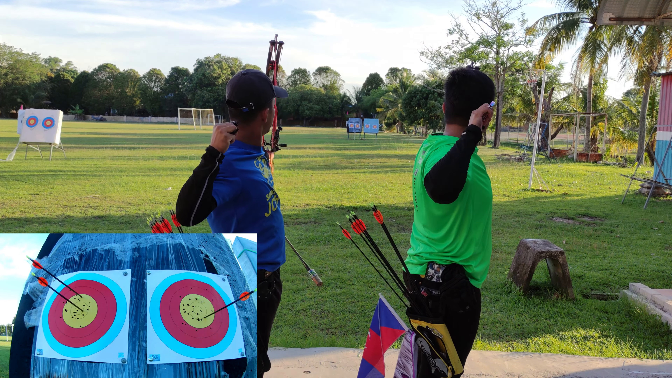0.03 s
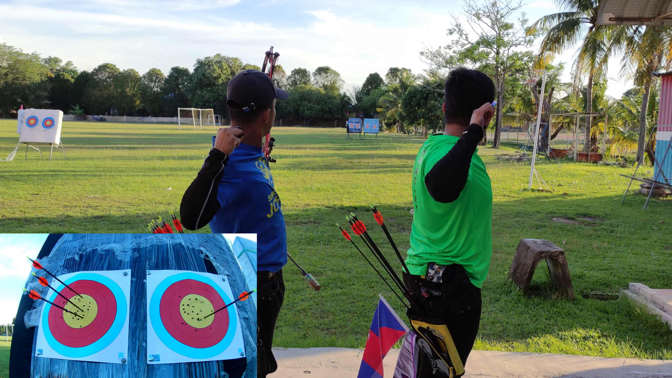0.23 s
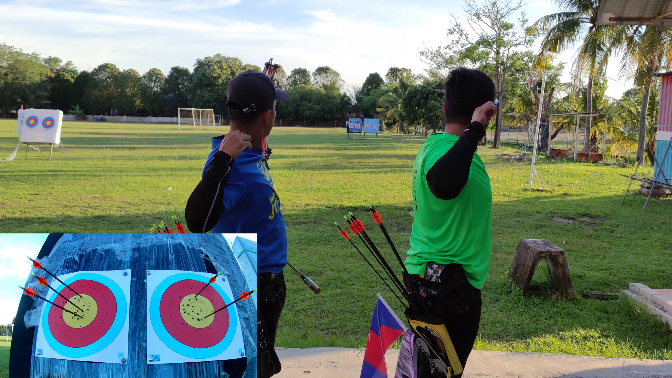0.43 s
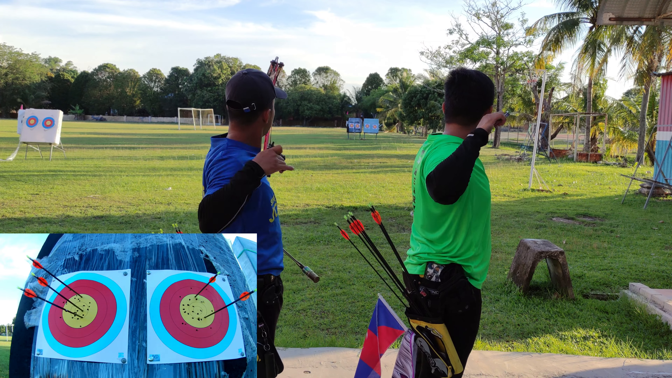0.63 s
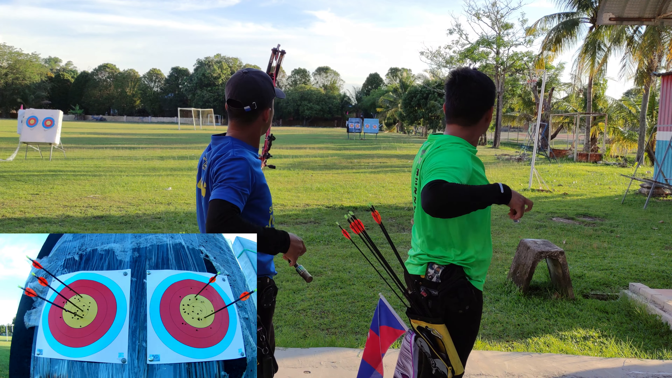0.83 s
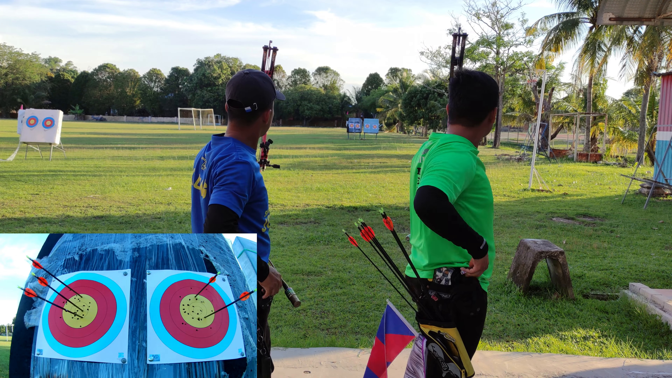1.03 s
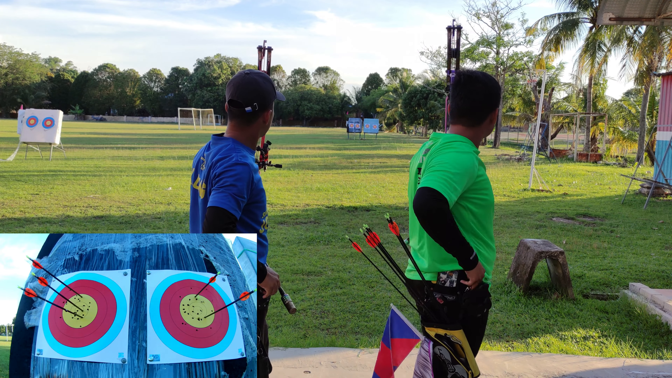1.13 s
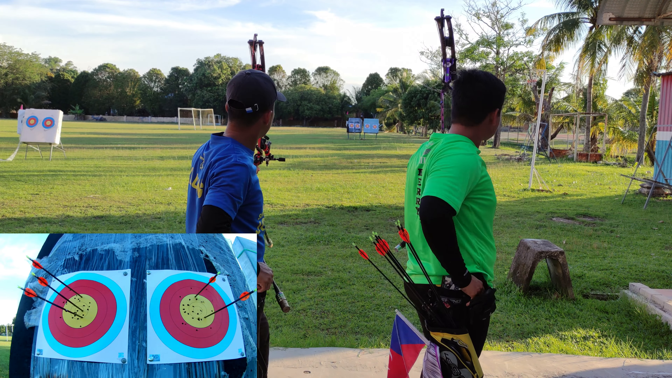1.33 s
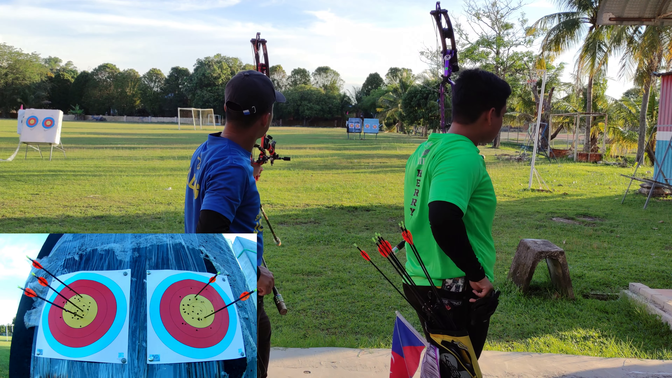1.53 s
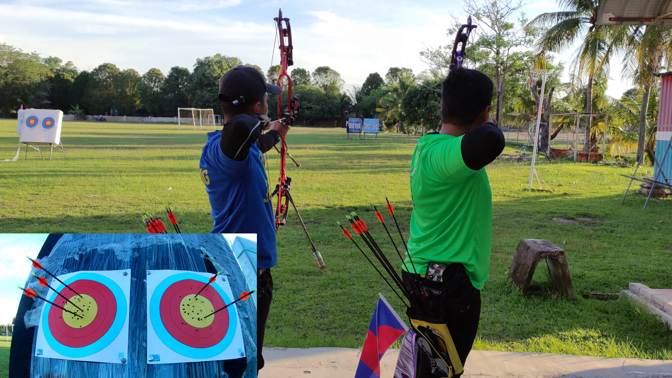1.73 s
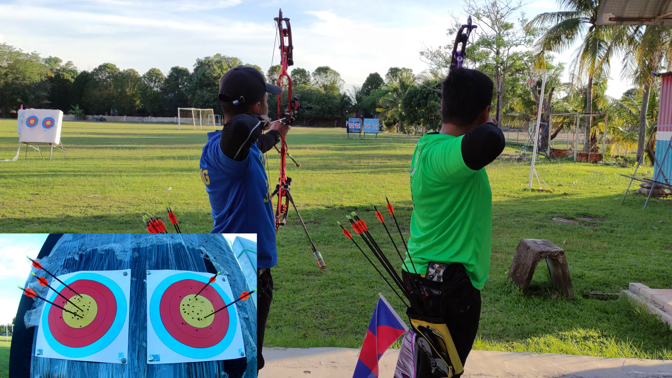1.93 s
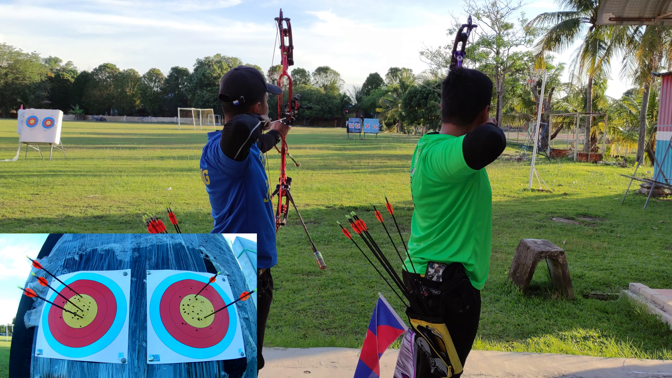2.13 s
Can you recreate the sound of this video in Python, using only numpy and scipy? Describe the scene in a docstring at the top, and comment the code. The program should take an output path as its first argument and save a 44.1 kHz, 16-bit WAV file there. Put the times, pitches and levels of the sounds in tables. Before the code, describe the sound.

A quick pair of bow shots cracks across an open field, followed by faint arrow rattling.

```python
"""An open field, where two archers loose their compound bows a tenth of a second apart.
Each shot is a crack and a short falling twang; milliseconds later the string knocks on its stop and
the bow thuds. A nearby wall returns a thin echo. Gear clicks softly as the bows are lowered and arrows
rustle in the quivers. Distant traffic rumbles throughout, with a light breeze on the microphone."""
import sys
import numpy as np
from scipy import signal
from scipy.io import wavfile

SR = 44100
rng = np.random.default_rng(int(sys.argv[2]) if len(sys.argv) > 2 else 0)


def file_out(sig):
    """Save sig as 16-bit WAV at sys.argv[1]."""
    # one column per channel
    cols = np.atleast_2d(sig).T
    # limit, then scale
    lim = np.clip(cols, -1, 1)
    pcm = np.round(lim * 32767).astype(np.int16)
    wavfile.write(sys.argv[1], SR, pcm)


N = 94815
T = np.arange(N) / SR


def from_db(db):
    """Decibels to gain."""
    return 10 ** (np.asarray(db) / 20)


def rms_one(x):
    """Scale to rms 1."""
    return x / np.sqrt(np.mean(x ** 2) + 1e-20)


def at_hz(points, hz):
    """Read a table on a log-frequency axis."""
    freqs, values = np.transpose(points)
    return np.interp(np.log(hz), np.log(freqs), values)


def fader(points):
    """Gain over time from (time [s], level [dB]) rows."""
    return from_db(np.interp(T, *np.transpose(points)))


def pan(db):
    """Stereo gains that put the left channel db above the right."""
    return from_db(db * np.array([[.5], [-.5]]))


def cut(x, hz, kind, order=2):
    """Butterworth low- or high-pass."""
    return signal.sosfilt(signal.butter(order, hz, kind, fs=SR, output="sos"), x + 1e-18)


def resonance(x, hz, width_hz):
    """Two-pole resonance with gain 1 at its peak."""
    r = np.exp(-np.pi * width_hz / SR)
    feedback = [1, -2 * r * np.cos(2 * np.pi * hz / SR), r * r]
    return signal.lfilter(np.array([1, 0, -1]) * (1 - r * r) / 2, feedback, x + 1e-18)


def decay(start, t60):
    """Envelope that jumps to 1 at start and falls 60 dB every t60 seconds."""
    age = np.maximum(T - start, 0)
    return (T >= start) * np.exp(-np.minimum(np.log(1000) * age / t60, 40))


def ring(start, hz, t60, sag=1e-6):
    """A struck sine whose pitch sinks as hz / (1 + sag * age)."""
    age = np.maximum(T - start, 0)
    return decay(start, t60) * np.sin(2 * np.pi * hz * np.log1p(sag * age) / sag)


def struck(start, modes):
    """A blow sets a table of modes ringing in alternating polarity."""
    return sum((-1) ** k * from_db(db) * ring(start, hz, t60) for k, (hz, db, t60) in enumerate(modes))


# Stereo width of the outdoor noise: (frequency [Hz], side minus mid [dB])
STEREO_WIDTH = [(60, -18), (110, -23.5), (200, -16.5), (380, -9.5), (700, -6.5), (1290, 0.5), (2380, -0.5),
                (4400, 0.5), (8120, 0), (15000, 0)]
def noise_bands():
    """A bank of stereo noise in third octaves: centres and signals."""
    edges = 20 * 2 ** (np.arange(30) / 3)
    centres = np.sqrt(edges[1:] * edges[:-1])
    white = rng.standard_normal((2, 2, N + 8000))
    bands = []
    for k, hz in enumerate(centres):
        bandpass = signal.butter(2, edges[k:k + 2], "band", fs=SR, output="sos")
        mid, side = signal.sosfilt(bandpass, white[k % 2])[:, -N:]
        width = from_db(at_hz(STEREO_WIDTH, hz))
        bands.append((mid + width * side * [[1], [-1]]) / np.hypot(1, width))
    return centres, np.array(bands)


def coloured(bank, spectrum):
    """Stereo noise with the given spectrum, rms 1."""
    centres, bands = bank
    return rms_one(np.tensordot(from_db(at_hz(spectrum, centres)), bands, 1))


# Low end of the traffic: (frequency [Hz], relative level [dB])
RUMBLE_EQ = [(20, -41), (35, -3), (55, 0), (90, 2.5), (140, -4.5), (220, -10), (330, -21.5), (600, -52)]
# The rumble swells near the end: (time [s], level [dB])
RUMBLE_FADER = [(0, -43), (.5, -41.5), (1.1, -42.5), (1.72, -42.5), (1.85, -39), (2.15, -39)]
# Midrange wash of the traffic: (frequency [Hz], relative level [dB])
WASH_EQ = [(200, -26), (400, -7), (650, -2.5), (900, 1), (1200, -1.5), (1800, -15.5), (3000, -21.5),
           (4500, -30.5), (9000, -60.5)]
# The wash drops back near the end: (time [s], level [dB])
WASH_FADER = [(0, -46.5), (.5, -46.5), (.9, -47), (1.7, -45.5), (1.82, -50.5), (2.15, -51)]
def traffic(bank):
    """Distant traffic lays a bed of low rumble and midrange wash."""
    rumble = fader(RUMBLE_FADER) * coloured(bank, RUMBLE_EQ)
    return rumble + fader(WASH_FADER) * coloured(bank, WASH_EQ)


# Airy top of the ambience: (frequency [Hz], relative level [dB])
AIR_EQ = [(2500, -5), (4500, -3.5), (6500, 9), (8000, 5), (9000, -17.5), (10500, -10), (16000, -1)]
# The hiss wavers and eases off: (time [s], level [dB])
AIR_FADER = [(0, -65.5), (.6, -69.5), (1.2, -66.5), (1.7, -72), (1.9, -74.5), (2.15, -74)]
def air(bank):
    """A faint, bright hiss hangs over the field."""
    return fader(AIR_FADER) * coloured(bank, AIR_EQ)


def breeze(level_db=-63, top_hz=55):
    """A light breeze flutters on each microphone port independently."""
    return from_db(level_db) * rms_one(cut(rng.standard_normal((2, N)), top_hz, "low", order=3))


# Tone of the shaking bow: (frequency [Hz], relative level [dB])
SHUDDER_EQ = [(50, -12), (300, 5.5), (800, -14), (1700, 0.5), (2600, -6.5), (4000, -16), (8000, -20),
              (16000, -44)]
# How long the shake lasts: (frequency [Hz], t60 [s])
SHUDDER_DECAY = [(100, 0.12), (400, 0.13), (1000, 0.058), (2500, 0.03), (8000, 0.013)]
def shudder(bank, start):
    """Limbs and fittings shake in a dull burst of noise; the treble dies first."""
    centres, bands = bank
    parts = from_db(at_hz(SHUDDER_EQ, centres))[:, None] * bands.mean(axis=1)
    burst = sum(part * decay(start, at_hz(SHUDDER_DECAY, hz)) for hz, part in zip(centres, parts))
    return burst / parts.sum(axis=0).std()


# The two shots: (time [s], twang pitch [Hz], twang level [dB], twang t60 [s], low-pass [Hz],
# shudder level [dB], echo level [dB], echo low-pass [Hz])
SHOTS = [(0.2371, 1610, 1, 0.017, 13000, -21, -21, 10400),
         (0.3493, 1643, -6, 0.029, 6560, -21.5, -28.5, 6700)]
# Bright attack of the first bow: (pitch [Hz], level [dB], t60 [s])
FIRST_CRACK = [(1826, -27, 0.032), (2230, -17.5, 0.009), (4330, -18.7, 0.0078), (7400, -27, 0.0074),
               (8740, -31, 0.0037)]
# Darker attack of the second bow: (pitch [Hz], level [dB], t60 [s])
SECOND_CRACK = [(1090, -5, 0.0038), (2270, -14.5, 0.016), (2683.0, -19, 0.02), (5370, -21.5, 0.0037)]
def releases(bank, sag_per_s=48.6):
    """Each bow cracks and shudders; its twang dives in pitch as the string goes slack."""
    out = 0
    for shot, crack in zip(SHOTS, (FIRST_CRACK, SECOND_CRACK)):
        start, hz, twang_db, t60, top_hz, shudder_db, *_ = shot
        twang = from_db(twang_db) * ring(start, hz, t60, sag_per_s)
        shake = from_db(shudder_db) * shudder(bank, start)
        out += cut(twang + struck(start, crack) + shake, top_hz, "low", order=3)
    return out


# Tone of the field's reverb tail: (frequency [Hz], relative level [dB])
SCATTER_EQ = [(300, 4), (1500, 9.5), (3000, -9), (7000, -10.5), (9000, -24), (11000, -27), (16000, -37)]
def field_scatter(bank, level_db=-44.5, t60=0.7):
    """The field scatters each shot back as a faint tail of noise."""
    tails = sum(decay(start, t60) for start, *_ in SHOTS)
    return from_db(level_db) * tails * coloured(bank, SCATTER_EQ)


# String hits and rebounds on the stops: (time [s], level [dB], pitch [Hz], t60 [s])
STOP_KNOCKS = [(0.2405, -3.5, 1173, 0.02), (0.2458, -17.9, 1540, 0.017), (0.3536, -2.5, 623.0, 0.0072),
               (0.3576, -11.5, 1620, 0.0055), (0.3627, -6.5, 504, 0.0081)]
# Body modes of the first bow: (pitch [Hz], level [dB], t60 [s])
FIRST_THUD = [(85, -41, 0.096), (131, -26, 0.066), (206, -20.5, 0.084), (298, -26, .08), (392, -7.5, .036),
              (549, -13, 0.063), (876, -9, .029), (1140, -31.5, .045)]
# Body modes of the second bow: (pitch [Hz], level [dB], t60 [s])
SECOND_THUD = [(154.4, -22.5, 0.11), (182, -22, 0.1233), (276, -14, 0.038), (406, -12, 0.0607),
               (560, -13, 0.052), (926, -23.5, 0.058), (1503, -12, 0.021)]
def string_stops(thud_delay_s=.003, top_hz=2760):
    """Each string knocks on its stop and the bow thuds; the soft rubber dulls both."""
    knocks = sum(from_db(db) * ring(start, hz, t60) for start, db, hz, t60 in STOP_KNOCKS)
    thuds = sum(struck(start + thud_delay_s, body)
                for (start, *_), body in zip(SHOTS, (FIRST_THUD, SECOND_THUD)))
    return cut(knocks + thuds, top_hz, "low", order=3)


# Resonant peaks that thin out the slapback: (frequency [Hz], gain [dB], width [Hz])
ECHO_PEAKS = [(1570, -1, 850), (4530, -6, 1200), (6900, -5.5, 960), (7920, 1.5, 630)]
def wall_echo(delay_s=.0565, t60=.005, click_db=17, spread=.35, wall_top_hz=8900):
    """A nearby wall slaps each shot back as a thin, bright tick with a puff of noise."""
    out = 0
    for start, *_, echo_db, top_hz in SHOTS:
        arrival = start + delay_s
        noise = rng.standard_normal(N) + spread * rng.standard_normal((2, N))
        click = from_db(click_db) * (np.arange(N) == int(arrival * SR))
        burst = click + noise * decay(arrival, t60)
        slap = sum(from_db(db) * resonance(burst, hz, width_hz) for hz, db, width_hz in ECHO_PEAKS)
        out += from_db(echo_db) * pan(db=-3) * cut(slap, top_hz, "low")
    return cut(out, wall_top_hz, "low", order=3)


GEAR_TOP_HZ = 8900
# Ring of arrows and fittings: (pitch [Hz], relative level [dB], t60 [s])
GEAR_MODES = [(2160, -8.5, 0.013), (2450, -5.5, 0.015), (2780, -6.5, 0.02), (3830, -11, 0.015),
              (5170, -13, 0.02), (7760, -10, 0.0089), (8430, -16.5, 0.0077)]
def gear_ring(force, pitch_hz, tick_db=-7, boost_db=10, boost_octaves=0.15):
    """A scuff ticks and rings the gear; the point of contact favours the modes near one pitch."""
    sound = from_db(tick_db) * cut(force, hz=2160, kind="high")
    for hz, mode_db, t60 in GEAR_MODES:
        width_hz = np.log(1000) / (np.pi * t60)
        focus_db = boost_db * np.exp(-(np.log2(hz / pitch_hz) / boost_octaves) ** 2)
        makeup = .5 * np.sqrt(SR / (np.pi * width_hz))   # narrow modes catch less of the noise
        sound += makeup * from_db(mode_db + focus_db) * resonance(force, hz, width_hz)
    return sound


# Handling clicks: (time [s], level [dB], length [s], favoured pitch [Hz], left minus right [dB])
GEAR_CLICKS = [(0.915, -50.5, 0.0077, 7800, 1), (1.134, -37, 0.0071, 2080, -3.5),
               (1.1363, -35.5, 0.0042, 8230, 0), (1.266, -44.5, 0.0048, 2440, -3),
               (1.371, -58, .01, 2480, -8), (1.397, -54.5, 0.011, 2700, -2), (1.441, -55, 0.011, 2430, -7),
               (1.501, -53.5, 0.0084, 2400, -5), (1.58, -56.5, 0.017, 2780, -6),
               (1.592, -44, 0.013, 2750, -3.5), (1.621, -48, 0.0077, 2550, -6),
               (1.651, -53, .009, 2550, -8), (1.736, -57, .006, 2500, -4)]
def gear_clicks(scatter_db=-14, scatter_t60=0.27, lag_s=.00006):
    """Arrows and fittings scuff as the bows are lowered, each click trailing a soft stereo tail."""
    out = np.zeros((2, N))
    for start, db, length, pitch_hz, pan_db in GEAR_CLICKS:
        touch = (T >= start) * np.exp(-np.clip((T - start) / length, 0, 2) ** 4)
        scuff = rng.standard_normal(N) * touch
        tail = from_db(scatter_db) * rng.standard_normal((2, N)) * decay(start, scatter_t60)
        out += from_db(db) * pan(pan_db) * gear_ring(scuff + tail, pitch_hz)
    left, right = cut(out, GEAR_TOP_HZ, "low", order=4)
    # The gear is off to one side and reaches the right port later.
    return np.array([left, np.interp(T - lag_s, T, right)])


# The rustle builds to one brief peak: (time [s], level [dB])
RUSTLE_FADER = [(0, -86), (1.25, -79), (1.38, -65.5), (1.55, -65), (1.61, -53), (1.68, -64.5), (1.8, -82),
                (2.15, -90)]
def quiver_rustle(grains_per_s=900):
    """Arrows shift in the quivers, their shafts making dense tiny contacts."""
    grains = (rng.random(N) < grains_per_s / SR) * rng.standard_normal((2, N))
    shafts = resonance(grains, hz=2700, width_hz=1020)
    return fader(RUSTLE_FADER) * rms_one(cut(shafts, GEAR_TOP_HZ, "low"))


def port_resonance(stereo, ring_db=4.5):
    """The left microphone port rings, adding a narrow treble peak."""
    left, right = stereo
    return np.array([left + from_db(ring_db) * resonance(left, hz=8160, width_hz=680), right])


def scene():
    """The bows in the middle, the gear to one side, the field around them."""
    bank = noise_bands()
    handling = gear_clicks()
    ambience = traffic(noise_bands()) + air(noise_bands()) + breeze()
    around = port_resonance(ambience + handling + quiver_rustle())
    return releases(bank) + field_scatter(bank) + string_stops() + wall_echo() + around


def record(dry):
    """The deep bass is lost, the loudest peaks are rounded off and the top is cut."""
    low_hz, ceiling, stopband_hz = 30, 1.02, 16500
    trimmed = cut(dry, low_hz, "high")
    rounded = trimmed / (1 + (trimmed / ceiling) ** 4) ** (1 / 4)
    return signal.sosfilt(signal.cheby2(16, 60, stopband_hz, fs=SR, output="sos"), rounded)


dry = scene()
out = record(dry)
file_out(out)
```